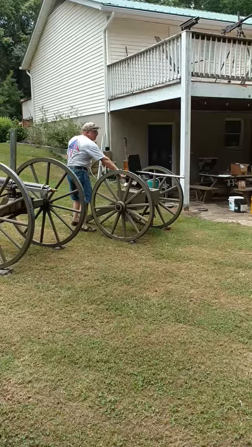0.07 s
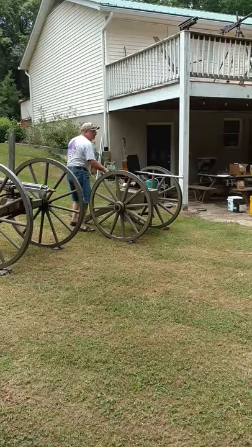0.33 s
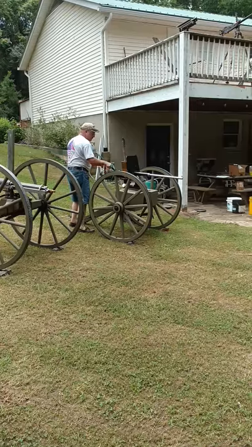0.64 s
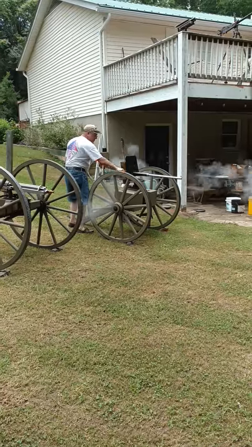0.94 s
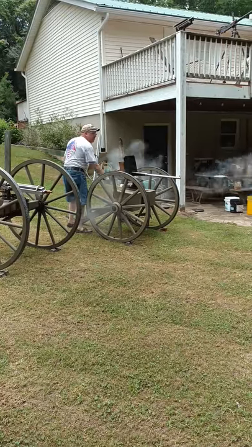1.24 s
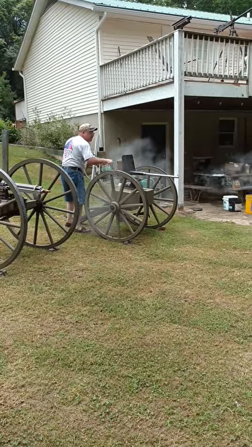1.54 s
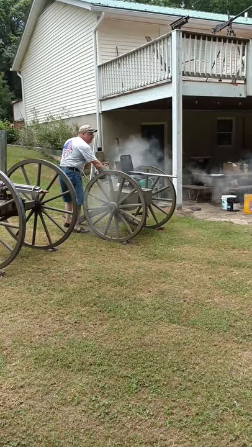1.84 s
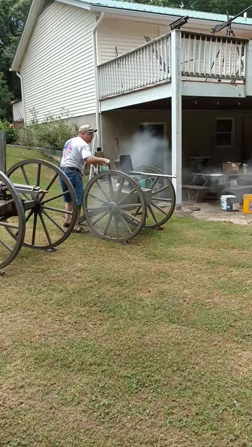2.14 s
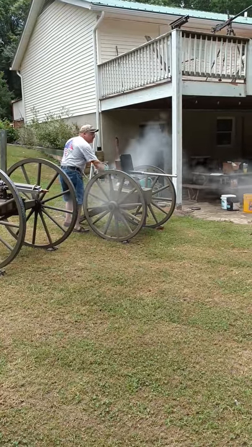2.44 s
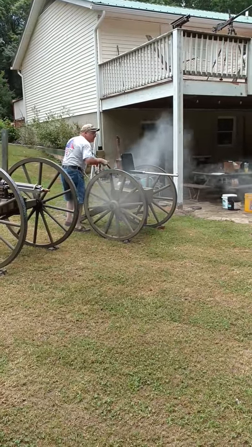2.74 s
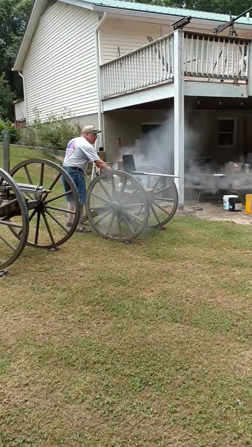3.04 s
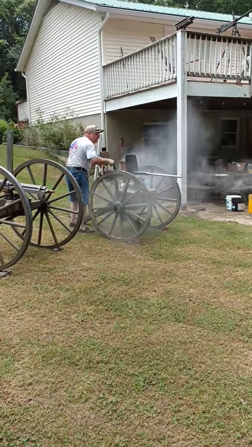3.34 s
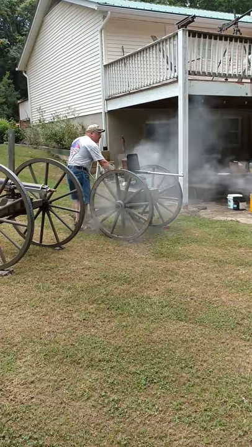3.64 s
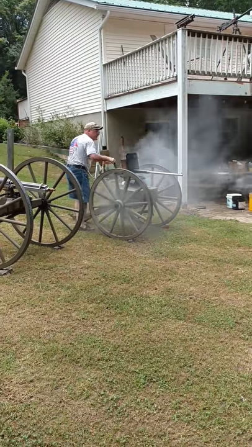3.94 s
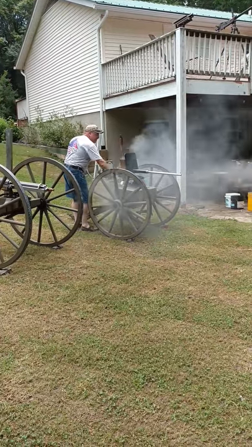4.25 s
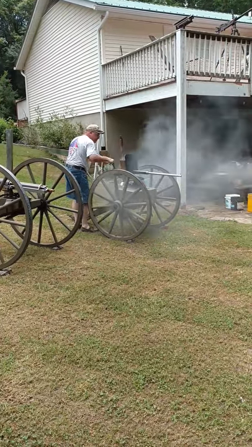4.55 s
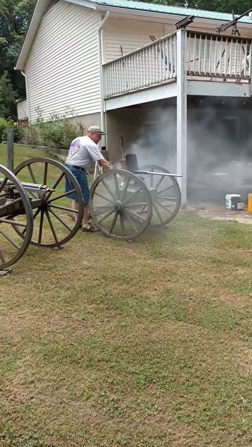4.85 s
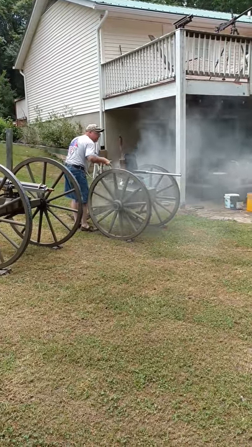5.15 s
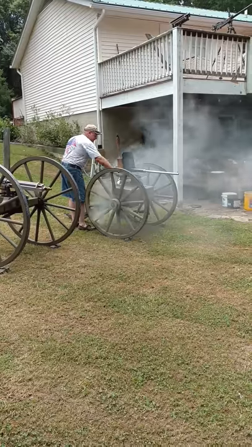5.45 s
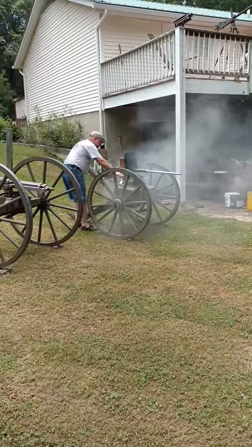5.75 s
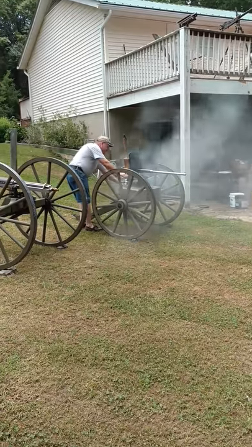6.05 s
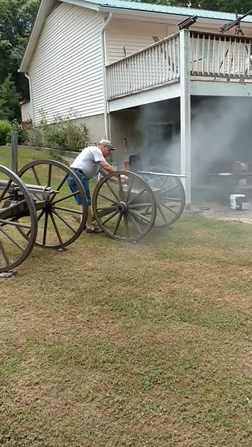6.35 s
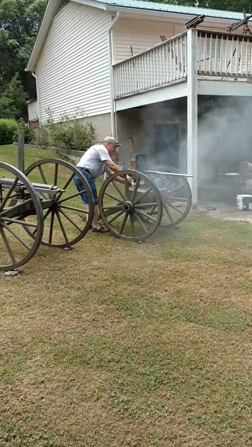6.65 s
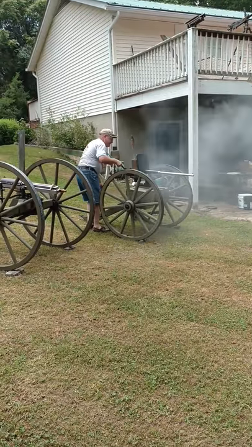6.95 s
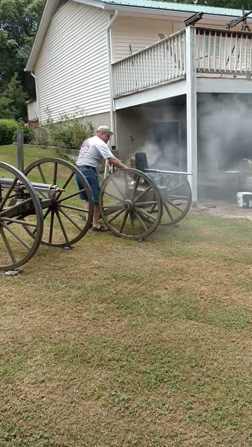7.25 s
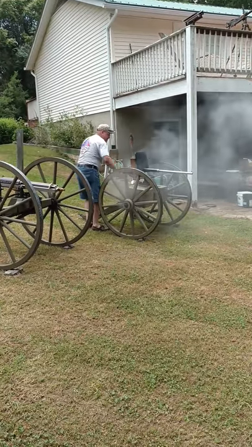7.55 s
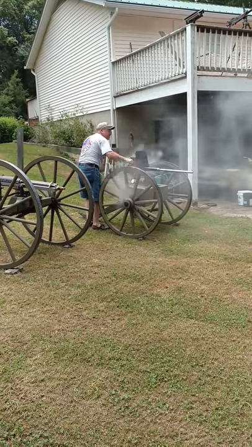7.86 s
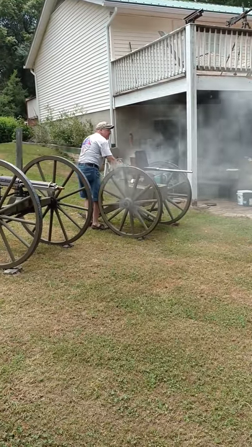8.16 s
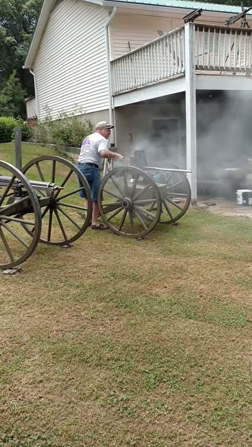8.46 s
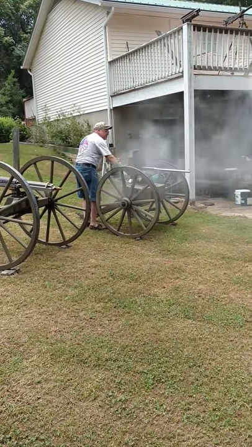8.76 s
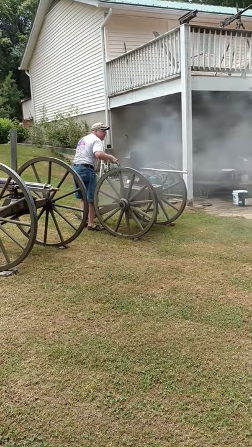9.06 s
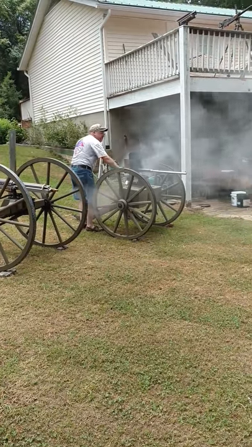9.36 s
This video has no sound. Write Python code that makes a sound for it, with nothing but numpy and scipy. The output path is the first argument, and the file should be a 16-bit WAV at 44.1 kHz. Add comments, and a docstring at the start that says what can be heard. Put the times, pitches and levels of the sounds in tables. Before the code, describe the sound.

On a still lawn beside a house, a wheeled gun cracks off eight sharp shots a little over half a second apart, stops for some soft clanks and knocks, then fires four more. Clacking steel, a short faint buzz and a soft thud come before the first shot. Every blast has a deep thump, quick echoes and a long tail fading through the trees, and overloads the nearby phone microphone.

```python
"""A hand-cranked black-powder gun on a lawn beside a house, heard on a phone with two microphones.
Steel clanks over still air and a brief low buzz; the carriage thuds as the crank is pulled.
Eight single shots follow. Each blast rings under the deck, slaps back twice from across the yard
and rolls away through the woods. The action clanks in a pause, then four more shots go off.
Throughout, the phone widens the stereo image, and it clips on the blasts."""
import sys
import numpy as np
from scipy import signal
from scipy.fft import rfft, irfft, next_fast_len
from scipy.io import wavfile
from scipy.ndimage import map_coordinates

SR = 44100
rng = np.random.default_rng(int(sys.argv[2]) if len(sys.argv) > 2 else 0)


def wrap_up_sound(samples):
    """Save the sound to the file named by the first command line argument, as 16-bit audio."""
    columns = np.atleast_2d(samples).T
    # keep every value between -1 and 1, then stretch to whole-number steps
    tamed = np.clip(columns, -1, 1)
    steps = np.round(tamed * 32767).astype(np.int16)
    wavfile.write(sys.argv[1], SR, steps)


N = 424241

# The microphone pair. Each row: frequency in Hz, likeness from 0 to 1, left lead in radians,
# left over right in dB.
MIC_PAIR = [(70, 0.24, -0.5, 0.5), (170, 0.81, -0.2, 3), (300, 0.9, -0.27, 3), (506, 1, -0.87, 5.5),
            (717, 0.93, 0, -3.5), (830, 0.4, 1.6, -0.5), (1255, 0.9, -1.5, 11), (1750, 0.4, 0.5, -8.5),
            (2333, 0.9, 2, -7), (3020, 0.1, -2, -6.5), (4570, 0, -2, -1), (10440, 0.3, 2, 1.5)]
# The shots. Each row: start in seconds, level of the surroundings' answer in dB, near slap in dB,
# far slap in dB, far slap delay in seconds.
SHOTS = [(0.852, 3, -8, -6.5, 0.1), (1.6271, 2, -14, -6.5, .1015), (2.2347, 2, -16, -6, .101),
         (2.9, 0.5, -14, -13, 0.1), (3.4575, 1.06, -17, -9, .102), (4.0602, 1.8, -8, -6.5, .099),
         (4.6663, 1.2, -13, -11.5, .102), (5.3215, 0.8, -16, -11.5, .1035), (7.1288, 2.5, -5, -5.5, .0995),
         (7.8634, 2, -8.5, -6.5, 0.1), (8.577, 1.5, -9, -7, 0.1), (9.2183, 1, -11, -10.5, .105)]
# Echoes off walls and trees. Each row: delay in seconds, level in dB, rise and t60 in seconds,
# centre in Hz, width in octaves.
ECHOES = [(.029, -17, 0.0078, 0.02, 2250, 1), (.047, -12, 0.0024, 0.017, 2070, 0.25),
          (.142, -26, 0.0028, 0.077, 1260, 0.53), (.165, -25.5, 0.0026, 0.033, 975, 1),
          (.181, -18.5, 0.0014, 0.022, 1910, 0.37), (.191, -22.5, 0.0037, 0.074, 810, 0.81),
          (.207, -26.5, .002, .025, 2500, .8), (0.341, -37, 0.0051, 0.18, 1180, 0.43),
          (0.422, -34, 0.0042, 0.081, 1187, 0.89)]
# The muzzle's thump, then hollow whoops from under the deck and off the railing. Each row: delay in
# seconds, level in dB, length in seconds, start and end pitch in Hz, left over right in dB.
WHOOPS = [(0, -16, 0.019, 197.3, 130, 17.5), (.036, -17.5, 0.021, 278, 180, 7.5),
          (.045, -11.5, 0.012, 717, 622, -5.5), (0.055, -16, 0.0274, 500.5, 812, -4),
          (.1, -32, .018, 189, 110, 0), (.177, -22, 0.023, 169, 167, 8.5),
          (0.235, -25, 0.015, 700, 700, -2)]
# Crank and bolts. Each row: start in seconds, steel level in dB, rise in seconds, carriage knock in dB.
CLACKS = [(.154, -39, 0.00092, -64), (.205, -40, 0.0051, -47.5), (.243, -19, 0.0077, -45.5),
          (.262, -27, 0.0028, -68), (.296, -26.5, 0.0078, -55), (.326, -20.5, 0.0039, -45),
          (.747, -51, .006, -49.5), (.765, -43, .008, -47), (.817, -23.5, 0.0018, -46),
          (6.608, -39.5, 0.0015, -34.5), (6.670, -62, .001, -43), (6.818, -38.5, .0011, -30),
          (6.932, -45, 0.0033, -45), (6.953, -37, 0.011, -44), (7.060, -44, 0.0072, -46.5)]
# Light metallic ticks between shots. Each row: start in seconds, level in dB.
TICKS = [(1.273, -43.5), (2.104, -34), (3.99, -52), (4.452, -32.5), (5.209, -35), (5.235, -38),
         (5.892, -35), (6.121, -45)]

# Resonances. Each row: frequency in Hz, level in dB, t60 in seconds.
DECK_MODES = [(182, -37, 0.73), (227, -35, 0.34), (272, -31, 0.58), (359, -26.5, 0.26), (481, -20.5, 0.24),
              (537, -20, 0.2), (592, -27.5, 0.16), (588, -19.5, 0.22), (653, -28, 0.3), (698, -24, 0.45),
              (747, -18.5, 0.28), (1107, -30.5, 0.23), (1295, -33, 0.47), (2067, -17, 0.34)]  # standing waves under the deck
FRAME_MODES = [(178, -10.5, .35), (760, -9, 0.26), (1870, -15, .2)]  # the carriage's frame after a knock

# Tone colours at the microphones. Each row: frequency in Hz, spectral density in dB.
AIR_SPECTRUM = [(25, -17), (70, -5.5), (170, 6), (400, -12.5), (700, -19.5), (2200, -19.5), (4200, -19),
                (8000, -33), (14000, -39.5)]
STEEL_SPECTRUM = [(100, -1), (400, -46.5), (750, -19.5), (1400, -15.5), (2150, 2), (3000, -7.5),
                  (4500, -7.5), (6600, -5.5), (9000, -23.5), (14000, -35)]
CARRIAGE_SPECTRUM = [(90, -37), (150, -4.5), (178, -5), (230, -17.5), (450, -23.5), (640, -11), (740, -6.5),
                     (880, -14), (1500, -17), (1850, -8.5), (2400, -15), (6000, -56.5)]
WOODS_SPECTRUM = [(30, -35), (80, -12.5), (160, -8), (320, -8), (650, -0.5), (1100, -4), (1550, -7),
                  (2200, 5), (3000, -5.5), (4200, -2), (8000, -14), (14000, -37)]
YARD_SPECTRUM = [(30, -30), (70, -20.5), (150, 0), (370, -8), (660, -4), (930, -7.5), (1200, -5),
                 (1500, -8), (2200, 2.5), (3200, -9.5), (4300, -6.5), (8000, -17.5), (14000, -29.5)]
SLAP_SPECTRUM = [(40, -14), (150, -17), (400, -20), (1100, -0.5), (2200, 5.5), (3200, 3), (4200, 3),
                 (8000, -12), (14000, -23)]
BASS_SPECTRUM = [(20, -5.5), (45, -5), (75, 1), (130, -16.5), (300, -51.5)]
BLAST_SPECTRUM = [(25, -12.5), (60, -25.5), (150, -2.5), (350, -4), (700, -3), (1500, -13), (2250, 5.5),
                  (3200, -11), (4700, -3.5), (8000, -11.5), (14000, -29)]
TICK_SPECTRUM = [(1500, -23), (4000, 1.5), (6600, 6), (9000, -12), (14000, -21)]

# How long the place rings. Each row: frequency in Hz, t60 in seconds.
YARD_T60 = [(50, 0.64), (170, 0.91), (650, 0.67), (2000, 0.76), (5000, 1), (13000, 0.65)]
WOODS_T60 = [(150, 2.9), (650, 4.58), (2000, 2.24), (4200, 1.69), (8000, 1.43), (14000, 1.3)]
# Balance of the bass thumps: left gain in dB, then right gain in dB.
BASS_BALANCE_DB = [-5, -14.5]


def amp(db):
    """Decibels to gain."""
    return 10 ** (np.asarray(db) / 20)


def unit(x):
    """Scale to rms 1."""
    return x / np.sqrt(np.mean(x ** 2) + 1e-20)


def along(points, hz):
    """Interpolate (Hz, value) points on a log frequency axis."""
    f, v = np.transpose(points)
    return np.interp(np.log(hz + 1), np.log(f), v)


def seconds(size):
    """Time axis of size samples."""
    return np.arange(size) / SR


def add(out, s, x):
    """Mix x into out from s seconds on."""
    start = max(round(s * SR), 0)
    part = x[..., :max(out.shape[1] - start, 0)]
    out[:, start:start + part.shape[-1]] += part


def hump(t, centre, width):
    """A smooth bell of height 1."""
    return np.exp(-((t - centre) / width) ** 2)


def wobble(t, per_s):
    """A random curve with per_s knots a second."""
    return map_coordinates(rng.standard_normal(256), [t * per_s], order=1)


def band(hz, octaves):
    """A hump of spectrum, 3 dB down that many octaves either side of hz."""
    skirt = [(-6, -60), (-3, -26), (-1, -3), (0, 0), (1, -3), (3, -26), (6, -60)]
    return [(hz * 2 ** (widths * octaves), db) for widths, db in skirt]


def noise(spectrum, size):
    """Coloured noise of rms 1 as the two microphones hear it."""
    padded = next_fast_len(size)
    hz = np.fft.rfftfreq(padded, 1 / SR)
    mic_hz, likeness, lead, balance_db = np.transpose(MIC_PAIR)
    shared = np.interp(hz, mic_hz, np.clip(likeness, 0, .98) * np.exp(-1j * lead))
    lean = amp(np.interp(hz, mic_hz, balance_db) / 2)
    left, unrelated = rfft(rng.standard_normal((2, padded)))
    right = shared * left + np.sqrt(1 - abs(shared) ** 2) * unrelated
    pair = np.array([left * lean, right / lean])
    return unit(irfft(pair * amp(along(spectrum, hz)), padded)[:, :size])


def fading(spectrum, t60s, size):
    """Noise in which each frequency dies at its own speed."""
    hz, t, bins = signal.stft(noise(spectrum, size), SR, nperseg=512)
    decay = amp(-60 * t / along(t60s, hz)[:, None])
    return signal.istft(bins * decay, SR, nperseg=512)[1][:, :size]


def burst(spectrum, rise, t60, size=8192):
    """A puff of noise that swells for rise seconds, then falls 60 dB in t60 seconds."""
    t = seconds(size)
    attack = np.minimum(t / max(rise, 1e-4), 1)
    decay = amp(-60 * np.maximum(t - rise, 0) / t60)
    return noise(spectrum, size) * attack * decay


def ring(modes, size=14000):
    """Damped modes, struck at slightly new strengths each time."""
    t = seconds(size)
    return sum(amp(db + 2 * rng.normal() - 60 * t / t60) * np.sin(2 * np.pi * (hz * t + rng.random()))
               for hz, db, t60 in modes)


def air():
    """Still summer air over the lawn, coming in just after the start."""
    fade_in = np.clip((seconds(N) - .077) / .022, 0, 1)
    return amp(-54.5) * noise(AIR_SPECTRUM, N) * fade_in


def buzz(pitch_hz=46.7, start_s=.075, end_s=.535):
    """A faint hollow buzz of odd harmonics, dead centre, swells, holds and stops."""
    t = seconds(N)
    tone = sum(amp(db) * np.sin(2 * np.pi * harmonic * pitch_hz * t)
               for harmonic, db in [(1, 11), (3, 7.5), (5, -5.5), (7, -30)])
    swell = np.clip((t - start_s) / .12, 0, 1)
    release = np.clip((end_s - t) / .02, 0, 1)
    return amp(-52) * swell * release * tone


def thud():
    """The carriage gives one soft thud as the crank is first pulled."""
    out = np.zeros((2, N))
    add(out, .695, amp(-40.5) * burst(band(210, octaves=.5), rise=.0066, t60=.075))
    return out


def action():
    """At the gun, steel parts clack and tick; the clacks knock the carriage and echo off the house."""
    out = np.zeros((2, N))
    for s, db, rise, knock_db in CLACKS:
        add(out, s, amp(db - 2) * burst(STEEL_SPECTRUM, rise, t60=.065))
        add(out, s, amp(db - 21) * burst(STEEL_SPECTRUM, rise=.045, t60=.68, size=24000))  # the house
        add(out, s, amp(knock_db) * burst(CARRIAGE_SPECTRUM, rise=.0015, t60=.19, size=12000))
        add(out, s, amp(knock_db) * ring(FRAME_MODES))
    for s, db in TICKS:
        add(out, s, amp(db - 3) * burst(TICK_SPECTRUM, rise=.001, t60=.06))
    return out


def woods(size=81920):
    """The distant roll swells in over about a third of a second, then fades in uneven clumps."""
    t = seconds(size)
    clumps_db = 2 * wobble(t, per_s=60) + 1.3 * wobble(t, per_s=12)
    swell = 1 - hump(t, centre=0, width=.31)
    return fading(WOODS_SPECTRUM, WOODS_T60, size) * swell * amp(clumps_db)


def yard(size=30000):
    """Dense reflections from house and lawn, with a few distinct echoes standing out."""
    t = seconds(size)
    lull_db = -2.5 * hump(t, centre=.075, width=.013)  # thins once the house has answered
    far_side_db = 2 * hump(t, centre=.18, width=.05)  # fills again from across the yard
    onset = 1 - np.exp(-t / .00072)
    wash = amp(lull_db + far_side_db - 12.5) * fading(YARD_SPECTRUM, YARD_T60, size) * onset
    for delay, db, rise, t60, hz, octaves in ECHOES:
        add(wash, delay, amp(db) * burst(band(hz, octaves), rise, t60))
    return wash


def slaps(near_delay=.0912):
    """Two hard surfaces across the yard return each crack: a near snap, then a broader far slap."""
    out = np.zeros((2, N))
    for s, _, near_db, far_db, far_delay in SHOTS:
        add(out, s + near_delay, amp(near_db) * burst(SLAP_SPECTRUM, rise=.00099, t60=.026))
        add(out, s + far_delay, amp(far_db) * burst(SLAP_SPECTRUM, rise=.0039, t60=.05))
    return out


def deck():
    """Close by, standing waves build up under the deck and ring out."""
    modes = ring(DECK_MODES)
    build_up = 1 - np.exp(-seconds(len(modes)) / .008)
    return modes * build_up


def whoops():
    """The muzzle's thump, then a few cycles at a time, gliding as rows of slats answer in turn."""
    out = np.zeros((2, SR // 3))
    for delay, db, length, start_hz, end_hz, pan_db in WHOOPS:
        size = round(length * SR)
        detune = 1 + .03 * rng.normal()
        turns = np.cumsum(np.linspace(start_hz, end_hz, size)) / SR * detune
        wave = amp(db + 1.5 * rng.normal()) * np.hanning(size) * np.sin(2 * np.pi * turns)
        add(out, delay, wave * amp([[pan_db / 2], [-pan_db / 2]]))
    return out


def bass_thumps(rise=.005, t60=.07):
    """A short, deep bass thump under each blast and its far slap, stronger on the left."""
    out = np.zeros((2, N))
    for s, _, _, far_db, far_delay in SHOTS:
        add(out, s, amp(-25) * burst(BASS_SPECTRUM, rise, t60))
        add(out, s + far_delay, amp(far_db - 37) * burst(BASS_SPECTRUM, rise, t60))
    return out * amp(BASS_BALANCE_DB)[:, None]


def gun(repeat_share=.55):
    """Each muzzle blast reaches the microphones directly, then by way of yard, deck and woods."""
    out = np.zeros((2, N))
    steady_paths = yard()  # gun and walls stay put, so much of the answer repeats from shot to shot
    for s, db, *_ in SHOTS:
        add(out, s, amp(-1.5) * burst(BLAST_SPECTRUM, rise=.00023, t60=.039))
        bounce = burst(BLAST_SPECTRUM, rise=.0013, t60=.051)  # off the ground and the near wall
        add(out, s + .0022, amp(-3) * bounce)
        answer = np.sqrt(repeat_share) * steady_paths + np.sqrt(1 - repeat_share) * yard()
        add(out, s, amp(db) * answer)
        add(out, s, amp(db - 4) * whoops())
        add(out, s + .016, amp(db - 3) * deck())
        add(out, s, amp(db - 22.5) * woods())
    return out


def scene():
    """Gun, echoes and action over the quiet of the lawn."""
    return gun() + slaps() + bass_thumps() + action() + thud() + air() + buzz()


def record(dry):
    """The phone subtracts a delayed copy of each channel from the other, clips, and cuts the top."""
    cross_samples, cross_gain, top_hz = 17, .76, 15600
    crossed = np.pad(dry[::-1], [(0, 0), (cross_samples, 0)])[:, :N]
    wide = dry - cross_gain * crossed
    clipped = np.clip(wide, -.93, .93)
    lowpass = signal.firwin(201, top_hz, fs=SR)
    return signal.oaconvolve(clipped, lowpass[None], mode="same", axes=1)


dry = scene()
out = record(dry)
wrap_up_sound(out)
```